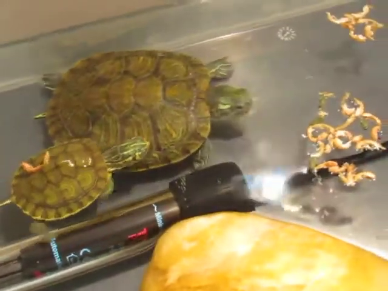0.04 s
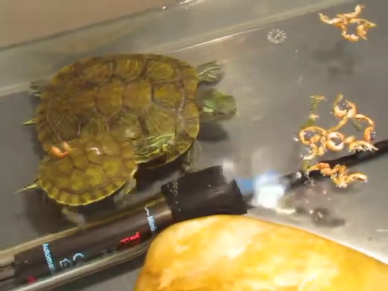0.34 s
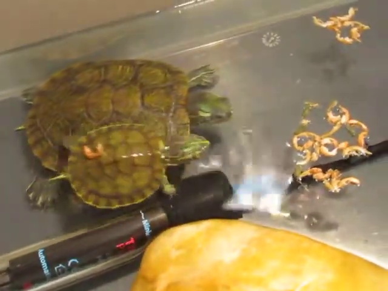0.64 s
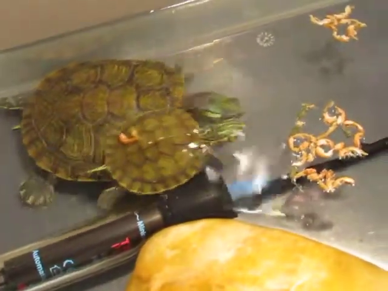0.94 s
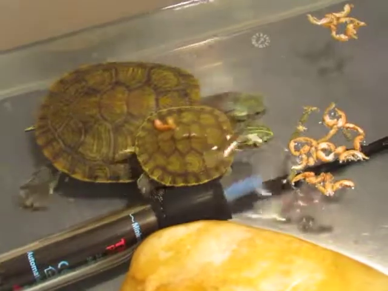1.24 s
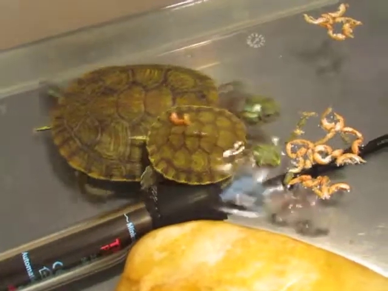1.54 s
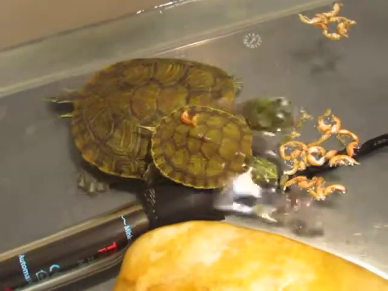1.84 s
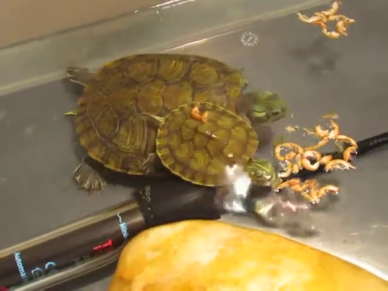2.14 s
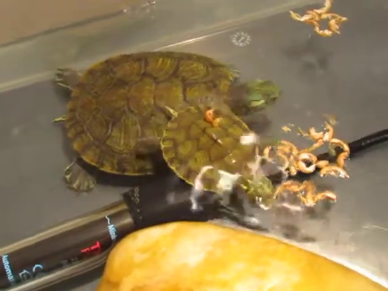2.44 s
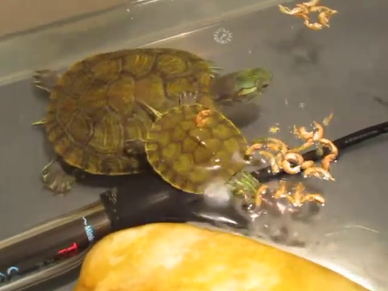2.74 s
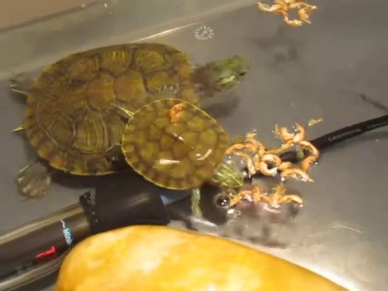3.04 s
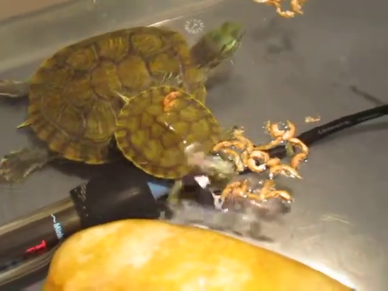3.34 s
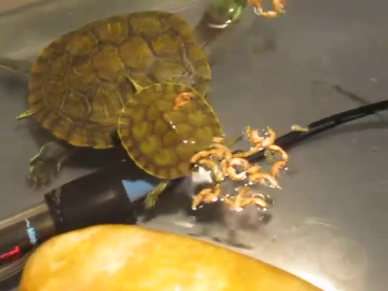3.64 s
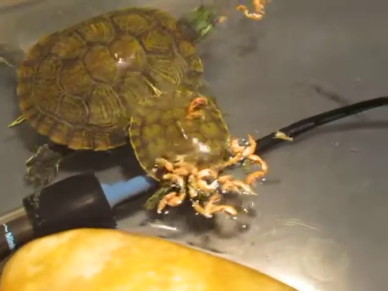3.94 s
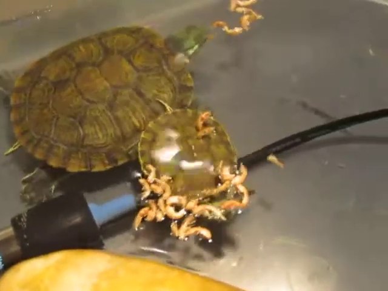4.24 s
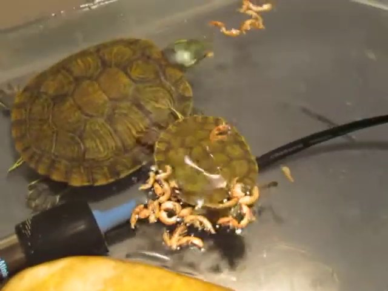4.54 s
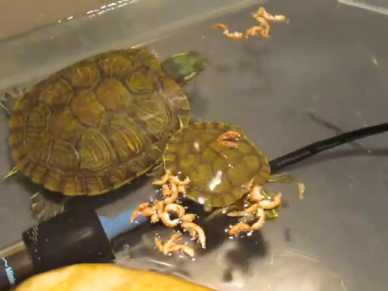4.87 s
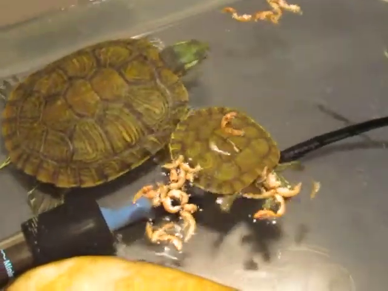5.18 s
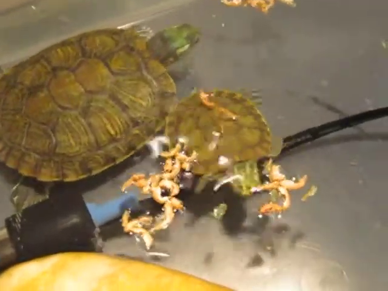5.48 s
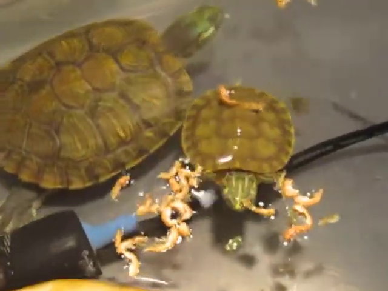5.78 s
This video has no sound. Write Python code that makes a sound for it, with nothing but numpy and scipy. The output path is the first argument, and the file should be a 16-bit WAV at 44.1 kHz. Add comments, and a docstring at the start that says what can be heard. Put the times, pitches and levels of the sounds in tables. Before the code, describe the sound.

A small electric pump hums low and steady beside a plastic tub of turtles indoors. Thin motor tones, a boomy rumble of moving air and a soft hiss lie underneath, with occasional faint swishes. The hum swells gradually as a hand-held microphone drifts over the water. Near the end, a feeding turtle makes a few tiny wet clicks.

```python
"""A small mains pump hums beside a plastic tub of turtles, its magnet pulling twice a mains cycle.
A hand-held phone drifts over the water, through the hum's standing wave. Near the end a feeding
turtle makes a few wet clicks, each a tiny ringing air pocket. Underneath lie thin motor tones,
a boomy rumble of moving air in the room and tub, and a steady hiss with soft swishes."""
import sys
import numpy as np
from scipy import signal
from scipy.fft import rfft, irfft
from scipy.io import wavfile
from scipy.ndimage import uniform_filter1d

SR = 44100
rng = np.random.default_rng(int(sys.argv[2]) if len(sys.argv) > 2 else 0)


def generate_wav(sig):
    """Save sig (samples, or channels by samples) to the path in sys.argv[1] as 16-bit PCM at SR."""
    pcm = np.round(np.clip(np.atleast_2d(sig).T, -1, 1) * 32767).astype(np.int16)
    wavfile.write(sys.argv[1], SR, pcm)


N = 260631
TIME_S = np.arange(N) / SR
BINS_HZ = np.maximum(np.arange(N // 2 + 1) * SR / N, 1)


# Left microphone near a node. Each row: time in seconds, level relative to the right in dB.
LEFT_MIC_PATH = [(0.0, -15.5), (2.45, -14.5), (2.63, -17), (2.83, -7.5), (3.42, -5.5), (3.58, -8),
                 (4.3, -2.5), (4.95, -7.5), (5.25, -13), (5.65, -13.0), (5.9, -8)]

def pump_hum(hz=100.015, crest_db=-5.8, crest_s=3.5, rise_db_per_s=1.15, left_lag_rad=.17, waver_db=.2):
    """The magnet pulls twice a mains cycle; the right microphone drifts into a standing-wave crest."""
    right_db = crest_db - rise_db_per_s * np.maximum(crest_s - TIME_S, 0) + waver_db * wander(14)
    left_db = right_db + np.interp(TIME_S, *np.transpose(LEFT_MIC_PATH))
    phase = 2 * np.pi * hz * TIME_S - np.array([[left_lag_rad], [0]])
    return np.sin(phase) * undb([left_db, right_db])


# Motor and mains tones. Each row: frequency in Hz, left level in dB, right level in dB.
MOTOR_TONES = [(18.5, -51, -57), (50, -50, -56), (200, -45.5, -45.5), (400, -56, -59), (469.5, -52, -52),
               (712, -62, -52), (1100, -60, -60), (1405, -64, -64), (1490, -63, -63), (1721, -64, -64)]

def motor_tones(waver_db=1.0, waver_rad=.4):
    """Thin tones of the running motor, each wavering in level and phase."""
    out = 0
    for hz, left_db, right_db in MOTOR_TONES:
        phase = 2 * np.pi * (hz * TIME_S + rng.random()) + waver_rad * wander(5)
        tone = np.sin(phase) * undb(waver_db * wander(3.3))
        out = out + tone * undb([[left_db], [right_db]])
    return out


# Air pockets. Each row: start in seconds, level in dB, pitch in Hz.
AIR_POCKETS = [(5.328, -31, 2100), (5.3885, -35, 2050), (5.418, -36, 1300), (5.42, -37, 1850),
               (5.436, -39.5, 950), (5.546, -37, 1900), (5.563, -37, 1600), (5.711, -31.5, 1650),
               (5.712, -31, 2420), (5.712, -32, 880)]

def turtle_clicks(rise_s=.0009, decay_cycles=20, glide=-.08, splash=.3, pan_db=2):
    """Each tiny air pocket rings briefly, roughened by the splash that opens it."""
    out, t = np.zeros((2, N)), TIME_S[:SR // 20]
    for start_s, db, hz in AIR_POCKETS:
        t60_s = decay_cycles / hz
        envelope = (1 - np.exp(-t / rise_s)) ** 2 * np.exp(-np.log(1000) * t / t60_s)
        pitch_hz = hz * (1 + glide * (np.minimum(2 * t / t60_s, 1) - .5))
        phase = 2 * np.pi * np.cumsum(pitch_hz) / SR
        bandpass = signal.butter(2, [hz / 2, hz * np.sqrt(2)], "band", fs=SR, output="sos")
        spray = signal.sosfilt(bandpass, rng.standard_normal(len(t)))
        ring = (np.sin(phase) + splash * spray / spray.std()) * envelope / envelope.max()
        start = int(start_s * SR)
        out[:, start:start + len(t)] += undb(db) * pan(pan_db) * ring
    return out


# Rumble spectrum. Each row: frequency in Hz, relative density in dB.
RUMBLE_SPECTRUM = [(10, -62), (30, -80), (50, -55), (72, -63), (110, -49.5), (145, -59), (220, -64.5),
                   (320, -65.5), (440, -70), (600, -80.5), (670, -71.5), (1100, -77), (2000, -82),
                   (5000, -99.5)]
# Resonances. Each row: centre in Hz, width in Hz, relative peak density in dB, left minus right in dB.
ROOM_AND_TUB_MODES = [(171.4, 14, -45.5, -0.5), (196.8, 9.5, -47.5, 0.5), (245.6, 7.5, -58, 16),
                      (341.6, 9.8, -59.5, -4), (374.8, 14.4, -56.5, 0), (536.7, 33, -63.5, 3.5),
                      (591, 33, -67.5, -10), (827, 14, -67, -3), (930, 28, -76.5, -7),
                      (1460, 390, -78.5, 0)]

def room_rumble(flicker_db=.47):
    """Moving air rings the low resonances of the room and the tub."""
    power = undb(spectrum(RUMBLE_SPECTRUM)) ** 2
    for hz, width_hz, db, pan_db in ROOM_AND_TUB_MODES:
        power = power + (undb(db) * resonance(hz, width_hz) * pan(pan_db)) ** 2
    return stereo_noise(np.sqrt(power)) * undb(flicker_db * wander(8.3))


# Hiss spectrum. Each row: frequency in Hz, relative density in dB.
HISS_SPECTRUM = [(900, -103), (2000, -84), (2550, -76), (2900, -78.5), (3350, -73), (3750, -75),
                 (4800, -76.5), (7500, -76), (8400, -78.5), (9600, -81), (10400, -78.5), (12500, -82.5),
                 (13500, -86), (14200, -113)]
# Hiss resonances. Each row: centre in Hz, width in Hz, level relative to the hiss in dB.
HISS_MODES = [(3360, 180, -17), (4870, 340, -7), (6150, 300, -10.5)]

def hiss(flicker_db=.8, bands=7):
    """Wide, faintly ringing hiss; each band shimmers on its own."""
    ring = 1 + sum(undb(db) * resonance(hz, width_hz) for hz, width_hz, db in HISS_MODES)
    noise_bins = rfft(stereo_noise(undb(spectrum(HISS_SPECTRUM)) * ring))
    centres_hz = np.geomspace(2000, 12000, bands)
    out = 0
    for weights in np.eye(bands):
        band = irfft(noise_bins * np.interp(BINS_HZ, centres_hz, weights), N)
        out = out + band * undb(flicker_db * wander(18))
    return out


# Swishes. Each row: peak time in seconds, length in seconds, centre in Hz, width in Hz, level in dB.
HISS_SWELLS = [(.15, 0.18, 6000, 9000, -40), (2.461, 0.084, 4430, 5500, -33.5),
               (2.448, .07, 10500, 5000, -41), (2.65, 0.051, 11000, 5000, -43.5),
               (3.092, 0.15, 10200, 7000, -40), (3.96, 0.5, 2380, 1250, -45),
               (4.05, .087, 7000, 10000, -40.5), (4.43, .08, 11500, 5000, -42.5),
               (4.77, .06, 12500, 3500, -47), (5.256, .09, 6000, 6000, -42.5),
               (5.43, .08, 7500, 7000, -43.5)]

def swishes():
    """Brief soft swells of high noise."""
    out, noise = np.zeros((2, N)), stereo_noise(1)
    for peak_s, length_s, hz, width_hz, db in HISS_SWELLS:
        near = np.abs(TIME_S - peak_s) < 2 * length_s
        bandpass = signal.iirpeak(hz, hz / width_hz, fs=SR)
        band = signal.lfilter(*bandpass, signal.lfilter(*bandpass, noise[:, near]))
        envelope = np.exp(-2 * ((TIME_S[near] - peak_s) / length_s) ** 2)
        out[:, near] += band / band.std() * undb(db) * envelope
    return out


# Microphone pair. Each row: frequency in Hz, left-right correlation.
MIC_CORRELATION = [(30, 0.69), (100, 0.48), (190, 0.69), (290, -0.45), (370, 0.2), (440, -0.013),
                   (540, 0.32), (900, 0.24), (1600, 0.55), (3600, .68), (5800, 0.46), (8000, 0.048),
                   (10500, -0.32), (14000, -0.45)]

def stereo_noise(amplitude_per_root_hz):
    """Shaped noise, partly alike on the two microphones."""
    correlation = np.clip(spectrum(MIC_CORRELATION), -1, 1)
    mid, side = rfft(rng.standard_normal((2, N)))
    pair = np.sqrt(1 + correlation) * mid + np.sqrt(1 - correlation) * side * np.array([[1], [-1]])
    return irfft(pair * amplitude_per_root_hz, N) * np.sqrt(SR) / 2


def undb(db):
    """Decibels to gain."""
    return 10 ** (np.asarray(db) / 20)


def spectrum(points):
    """Join (Hz, value) points on a log-frequency axis."""
    hz, value = np.transpose(points)
    return np.interp(np.log(BINS_HZ), np.log(hz), value)


def resonance(hz, width_hz):
    """Steep-sided gain curve, 1 at its centre."""
    detuning = (BINS_HZ / hz - hz / BINS_HZ) * hz / width_hz
    return 1 / (1 + (np.sqrt(2) - 1) * detuning ** 2)


def pan(left_minus_right_db):
    """Left and right gains with a mean of 1."""
    gains = undb([[left_minus_right_db / 2], [-left_minus_right_db / 2]])
    return gains / gains.mean()


def wander(rate_hz):
    """Random steps, smoothed twice; standard deviation 1."""
    size = int(SR / rate_hz)
    steps = np.repeat(rng.standard_normal(N // size + 1), size)
    smooth = uniform_filter1d(uniform_filter1d(steps, size), size)[:N]
    return smooth / smooth.std()


def fade(start_db, hold_s, sag_db_per_s):
    """Gain that holds, then sinks steadily."""
    return undb(start_db - sag_db_per_s * np.maximum(TIME_S - hold_s, 0))


def scene():
    """Hum in front, rumble and hiss slowly sinking behind it, clicks on top."""
    pump = pump_hum() + motor_tones()
    background = room_rumble() * fade(start_db=1.89, hold_s=1.87, sag_db_per_s=1.05)
    background += hiss() * fade(start_db=.99, hold_s=2.1, sag_db_per_s=1.0)
    return pump + background + swishes() + turtle_clicks()


def record(dry, cutoff_hz=13750):
    """The phone has two narrow treble notches and cuts the top."""
    for hz, width_hz in ((3930, 330), (7870, 170)):
        dry = signal.lfilter(*signal.iirnotch(hz, hz / width_hz, fs=SR), dry)
    lowpass = signal.ellip(8, .2, 70, cutoff_hz, fs=SR, output="sos")
    return signal.sosfilt(lowpass, dry)


dry = scene()
out = record(dry)
generate_wav(out)
```